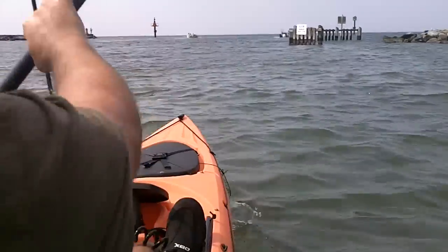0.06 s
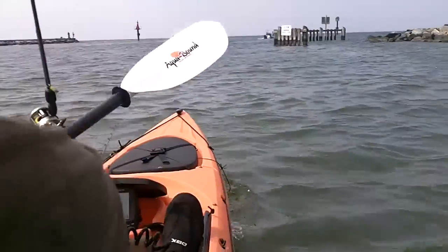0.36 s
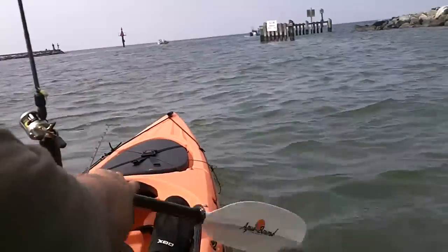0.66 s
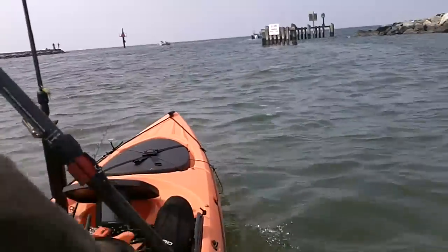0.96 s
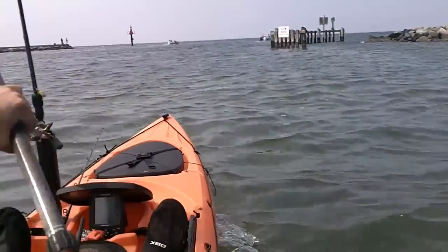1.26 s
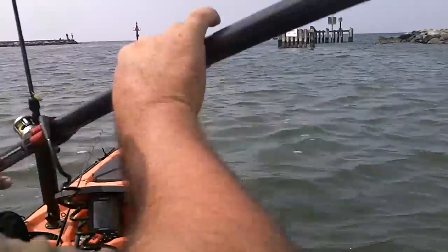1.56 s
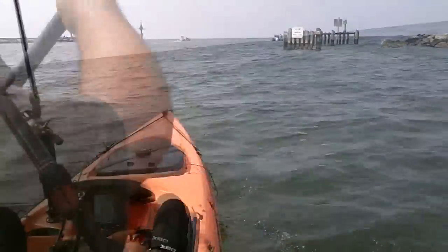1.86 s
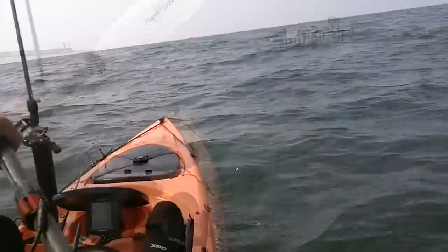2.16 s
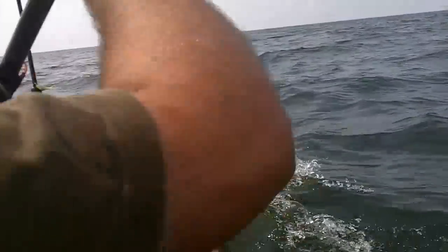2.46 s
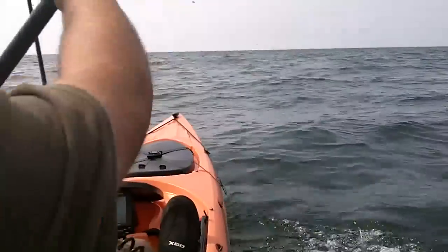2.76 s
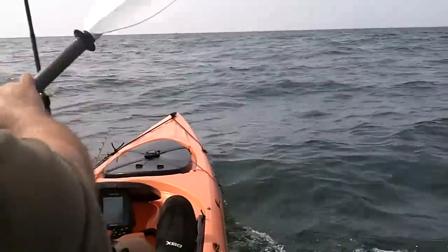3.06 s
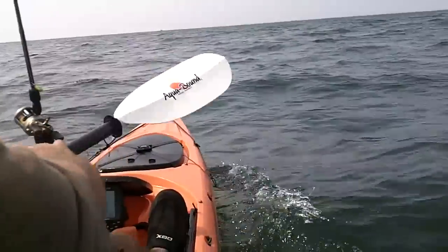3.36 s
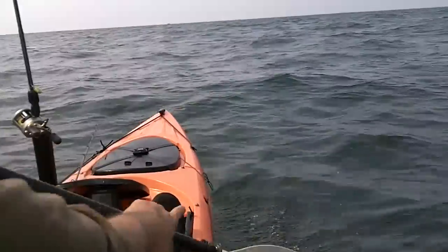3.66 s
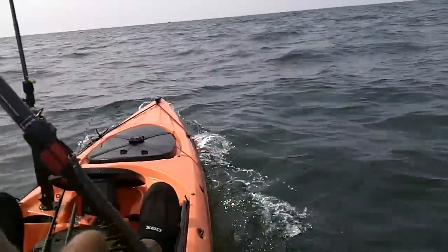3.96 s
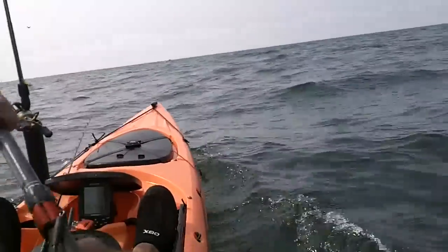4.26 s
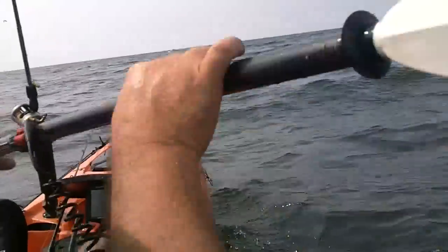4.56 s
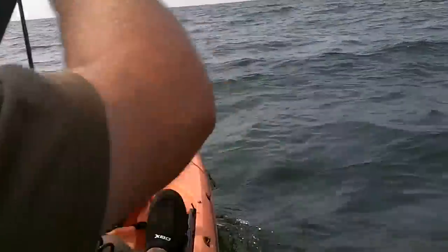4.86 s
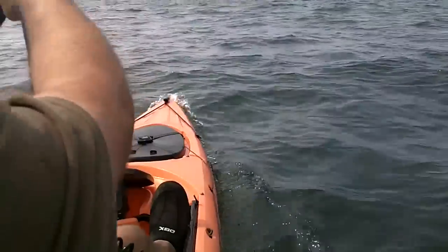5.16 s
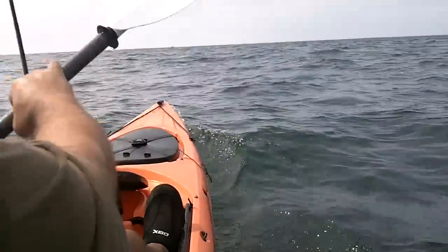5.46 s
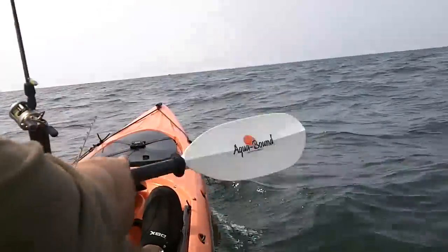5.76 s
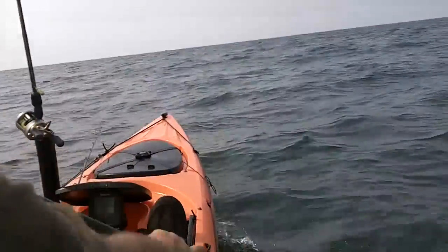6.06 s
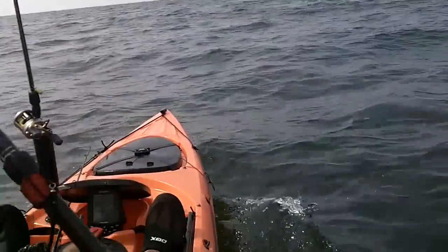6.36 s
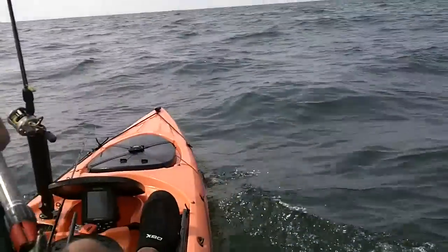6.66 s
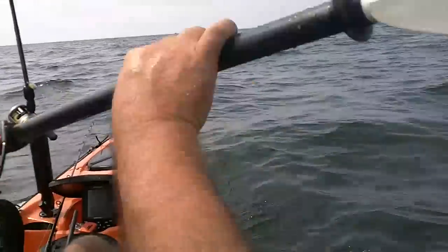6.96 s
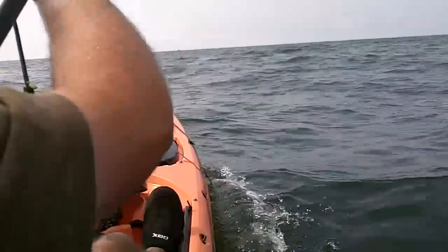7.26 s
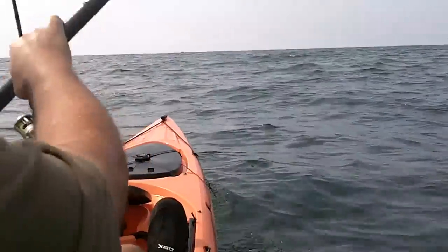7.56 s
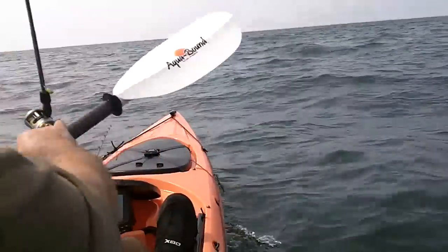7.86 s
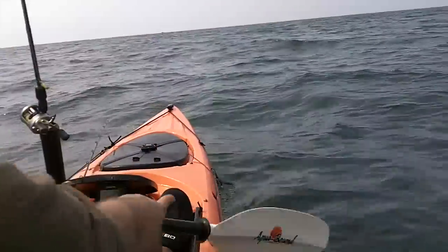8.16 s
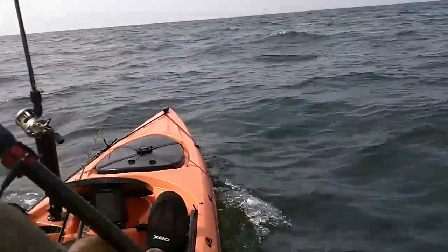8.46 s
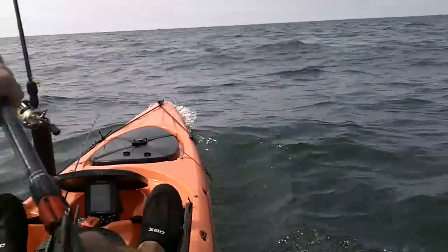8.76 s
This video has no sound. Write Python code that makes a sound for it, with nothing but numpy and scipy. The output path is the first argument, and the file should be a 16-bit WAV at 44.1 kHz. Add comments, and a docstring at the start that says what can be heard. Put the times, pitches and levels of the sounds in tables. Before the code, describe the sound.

Wind rumbles on a microphone just behind a kayak paddler on choppy open water, with no echo. Wavelets splash against the hull and single drops slap and plink close by throughout. Gusts thump during the first second, and the paddle shaft gives one dry knock at 0.7 seconds. The blade pulls through the water with gurgles and glugs at about 1.1 and 2.1 seconds, with more gusts around 1.7 and 2.5. A very faint high sizzle lies behind this opening. At 2.7 seconds there is a sharp click, the sizzle stops, and wind and water abruptly turn quieter. Further bubbling strokes come at about 4.2, 6.6 and 8.6 seconds, with a few small bright ticks along the way. Gusts return around 3.6, 4.8 and 5.7 to 6 seconds, and are strongest from 7.1 to 8.4, briefly pushing the water down beneath their low thumps.

```python
"""A kayak paddle pulling through choppy open water, heard from a camera just behind the paddler.
The blades drag air under, which gurgles and glugs; the shaft knocks once, wavelets slap the hull
and drops patter back on the sea, with no echo. Gusts rumble and thump on the exposed microphone,
and its gain control ducks the water under them; the housing cuts narrow notches in the treble."""
import sys
import numpy as np
from scipy import signal
from scipy.fft import rfft, irfft, next_fast_len
from scipy.io import wavfile
from scipy.ndimage import map_coordinates

SR = 44100
rng = np.random.default_rng(int(sys.argv[2]) if len(sys.argv) > 2 else 0)


def waveform_to_disk(signal):
    """Save audio, clipped to [-1, 1], as 16-bit WAV at the path in sys.argv[1]."""
    frames = np.transpose(np.atleast_2d(signal))
    scaled = np.clip(frames, -1, 1) * 32767
    samples = np.round(scaled).astype(np.int16)
    wavfile.write(sys.argv[1], SR, samples)


N = 397998

# Levels are relative: each source applies its own gain on top.
# spectra at the microphone: f/Hz, level/dB
SIZZLE_SPECTRUM = [(5000, -33), (5800, 1), (6100, -4), (6370, -2.5), (6800, -6), (7300, -16), (8000, -47)]  # faint high band in the background
RUMBLE_SPECTRUM = [(8, -22), (20, -7.5), (35, 2.5), (70, -4.5), (100, -7), (140, -15.5), (200, -28.5),
                   (400, -46), (1000, -100)]  # slow swings of wind pressure
EDDY_SPECTRUM = [(40, -2.5), (90, -28), (150, 5), (250, -7.5), (400, -11.5), (800, -23.5), (1600, -35.5),
                 (4000, -100), (9000, -83)]  # small separate eddies
CHURN_SPECTRUM = [(40, -17), (90, -17.5), (150, 2), (250, -0.5), (400, -23), (800, -50), (1600, -60)]  # smooth turbulence beneath them
CRACKLE_SPECTRUM = [(1000, -6), (4900, 3), (6500, -22), (9600, -1), (14500, -9.5)]  # an eddy's tip in the microphone port
SPLASH_SPECTRUM = [(100, -0.5), (250, -0.5), (500, -4), (900, -5), (1500, -6), (2200, -9), (3200, -18.5),
                   (6000, -31), (12000, -72)]  # body of breaking water
SPRAY_SPECTRUM = [(1200, -3.5), (2400, -13), (3300, 1.5), (4900, 1.5), (5150, -9), (6200, -10), (7200, -19),
                  (8400, -24.5), (9600, -20), (12000, -21.5), (13600, -28), (15200, -28)]  # fine spray
TICK_SPECTRUM = [(1500, -34), (4500, 4), (7000, -10), (9500, -5), (12000, -8), (15000, -16)]  # ticks and bursting foam
GURGLE_SPECTRUM = [(150, -34), (300, -4.5), (500, -2), (800, -9.5), (1300, -18), (3000, -53)]  # bubbles behind a blade
# course of the background sizzle: t/s, level/dB
SIZZLE_LEVELS = [(0, -1), (2.6, 3), (2.72, -43)]
# breeze on the microphone between gusts: t/s, rumble/dB, eddies/dB
BREEZE_LEVELS = [(0, -18, -28.5), (.85, -17.5, -33), (1.4, -16.5, -25), (2.1, -15, -26), (2.68, -17.5, -29),
                 (2.76, -29, -39), (3.1, -28, -38.5), (3.75, -23.5, -45), (4.4, -24, -37),
                 (5.1, -25.5, -54.5), (6.3, -21, -45), (6.55, -26, -60), (6.9, -24.5, -42),
                 (7.45, -18.5, -42), (8.2, -21, -41), (8.55, -26.5, -42.5), (9.02, -23.5, -37)]
# gusts on the microphone: t/s, length/s, pressure/dB, eddies/dB relative to the pressure
WIND_GUSTS = [(.172, 0.024, 0.5, -16.5), (0.345, 0.046, -3, -12), (.435, 0.027, 1.5, -29),
              (0.595, 0.037, 2, -17), (0.757, 0.036, 1, -18), (1.018, 0.082, -10, -19),
              (1.685, .15, 3, -20.5), (1.9, 0.018, -11, -11.5), (2.22, 0.033, -8.5, -10.5),
              (2.47, .03, -1.5, -8), (2.554, 0.04, -3.5, -16), (2.7, 0.012, -7, -12.5),
              (2.805, 0.086, -10, -18), (3.564, 0.072, -4, -32), (3.93, 0.022, 1.5, -26.5),
              (4.731, 0.08, -3, -16.5), (4.84, 0.075, 2.5, -21), (5.687, 0.089, 0, -17.5),
              (5.864, 0.035, -3.5, -18.5), (5.963, 0.036, -2.5, -24), (6.018, 0.041, 5.5, -27),
              (7.11, 0.21, -2, -14), (7.286, 0.093, 3, -18), (7.685, 0.052, 5.5, -15.5),
              (7.78, 0.078, 9, -23.5), (7.999, 0.078, 2, -19.5), (8.242, 0.019, 0.5, -25),
              (8.299, .085, 4, -20.5)]
# the hardest eddies to hit the microphone port: t/s, level/dB, half width/ms
PORT_BUFFETS = [(0.18, 0.5, 0.99), (0.358, 2, 0.99), (.402, -7, .73), (.441, 5.5, 2.8), (.593, 2.5, 4.1),
                (.626, -5, 0.24), (1.326, -7, 0.35), (1.68, 2, 0.55), (1.706, -1.5, 0.64), (1.755, 1, 1.9),
                (2.225, 0.5, 0.69), (2.475, 1, 0.49), (2.603, 0.5, 1.9), (2.712, 5.5, 1.6),
                (2.84, -3.5, 2.8), (2.887, -4, 1.7), (3.373, -6.5, 2), (3.556, 7.5, 0.51), (3.603, 3.5, 14),
                (3.94, -7.5, 1.6), (4.745, -0.5, 1.4), (4.792, -9, .79), (4.857, 5, 0.37),
                (4.872, 0.5, .68), (4.94, -4, 1.3), (5.691, -8, 1.2), (5.741, -5, 1.1), (5.793, -5, 0.86),
                (5.875, -1, 3.8), (5.932, -1, 4.3), (5.97, -2.5, 0.65), (6.009, -2, 4.6),
                (7.102, -0.5, 0.93), (7.167, 2.5, 1.1), (7.195, -8, 1), (7.221, -6.5, .9),
                (7.299, -3, 0.18), (7.326, -7, 0.39), (7.389, -0.5, 3.6), (7.677, -6.5, 1.8),
                (7.715, 8, 4.8), (7.823, -2.5, 0.42), (7.975, -6, 0.75), (8.004, 4, 3.5),
                (8.043, -3.5, 0.48), (8.334, 3, 0.77), (8.376, -0.5, 0.55)]
# choppy sea all around the boat: t/s, splash/dB, spray/dB
SEA_LEVELS = [(0, -38.5, -42), (.25, -42, -45), (.9, -42, -46.5), (1.2, -43.5, -43), (1.45, -38.5, -38.5),
              (1.9, -39, -41), (2.69, -35.5, -37.5), (2.74, -48.5, -50.5), (3.3, -41, -44.5),
              (3.75, -49, -48.5), (4.1, -43, -42.5), (4.7, -38.5, -42), (5.15, -47.5, -50),
              (5.6, -48, -50.5), (6.95, -40.5, -41.5), (7.55, -44.5, -47.5), (8.5, -43.5, -47.5),
              (8.75, -38, -42.5)]
# wavelets breaking and water thrown by a blade: t/s, splash/dB, spray/dB
NEAR_SPLASHES = [(.035, -37, -43), (.13, -44, -50), (.33, -59, -52), (0.529, -42, -41.5), (1.001, -38, -45),
                 (1.272, -40, -34.5), (1.411, -37, -38), (1.62, -35, -36), (1.98, -37, -44),
                 (2.418, -34, -34), (3.2, -48, -43.5), (3.27, -58, -49), (4.6, -43, -40), (4.981, -57, -49),
                 (6.115, -61, -47), (6.69, -54, -55), (6.958, -37.5, -45.5), (8.14, -49, -44.5),
                 (8.75, -56, -50), (8.92, -53.5, -53)]
# short bright ticks and one sharp dry click: t/s, level/dB
BRIGHT_TICKS = [(2.605, -39), (2.634, -44), (2.715, -20), (3.208, -34.5), (3.252, -40), (3.37, -33),
                (3.788, -31.5), (5.537, -34), (7.47, -29)]
# slaps and drops beside the boat: t/s, level/dB, f/Hz, slap/dB relative to the level
WATER_DROPS = [(0.8583, -18, 4040, -8), (1.1883, -18.5, 3140, 0.5), (1.557, -13.5, 4280, -25),
               (2.0363, -17.5, 1520, -19), (2.111, -17, 3860, -2.5), (2.6035, -14.5, 1090, 4),
               (3.1526, -21.5, 3500, -28), (3.474, -17, 4470, -18), (3.7743, -27, 3060, -6),
               (3.9144, -18.5, 1170, -5), (4.1159, -21.5, 2120, 0.5), (4.4172, -20.5, 4760, -26),
               (5.48, -24, 3280, -19), (6.113, -16.5, 4770, -36), (6.127, -21.5, 3880, -28),
               (6.612, -18, 1390, -3), (6.685, -17.5, 990, -14), (6.9964, -17, 4700, -4),
               (7.91, -29, 810, 12.5), (8.7364, -14.5, 4930, -8), (8.8467, -35, 1310, 11),
               (8.9255, -16, 960, -1), (8.9335, -24, 3560, -10)]
# a hard knock of the paddle: t/s, level/dB
PADDLE_KNOCKS = [(0.7025, -19.5)]
# modes of the paddle shaft: f/Hz, level/dB, t60/s
SHAFT_MODES = [(740, -0.5, 0.029), (1310, 9, 0.0057), (2040, 14.5, 0.0047), (3540, -3.5, 0.024),
               (9800, -16, .005)]
# the largest air pockets closing behind a blade or under the hull: t/s, level/dB, f/Hz
AIR_POCKETS = [(1.145, -22, 520), (1.182, -28, 682), (1.299, -23.5, 547), (1.361, -18.5, 462),
               (1.41, -21, 254), (1.63, -28, 868), (2.082, -28, 1440), (2.09, -20, 538), (2.097, -23, 784),
               (2.162, -23, 490), (2.223, -19, 916), (2.244, -21, 734), (2.28, -25, 486), (4.212, -18, 604),
               (4.223, -20, 1150), (4.36, -25.5, 1340), (4.366, -23, 501), (4.393, -21, 346),
               (4.462, -21.5, 312), (4.485, -28, 473), (4.562, -24, 990), (4.68, -26, 1100),
               (5.055, -33, 674), (5.225, -33.5, 552), (6.565, -26.5, 793), (6.703, -19, 1120),
               (6.86, -21, 1590), (6.9, -20, 1420), (6.931, -24, 1180), (6.964, -35, 440),
               (7.028, -34, 488), (7.867, -19, 1710), (8.13, -27, 1450), (8.662, -22, 807),
               (8.769, -23, 485), (8.925, -26, 336)]
# pulls of a blade, ahead of the microphone: t/s, length/s, level/dB
PADDLE_STROKES = [(1.13, .5, -34.5), (2.07, 0.28, -37), (4.193, 0.76, -36), (6.57, 0.58, -48),
                  (8.642, 0.4, -39.5)]
# cancellations in the camera housing: f/Hz, width/Hz
HOUSING_NOTCHES = [(2730, 520), (5500, 520), (7880, 900), (10950, 650)]


def amp(db):
    """Decibels to gain."""
    return 10 ** (np.asarray(db) / 20)


def unit(x):
    """Scale to rms 1."""
    return x / np.sqrt(np.mean(x ** 2) + 1e-20)


def curves(rows):
    """One value per sample for each column after the time."""
    times, *columns = np.transpose(rows)
    return [np.interp(np.arange(N) / SR, times, column) for column in columns]


def wobble(rate):
    """A smooth random curve, rate knots a second."""
    return map_coordinates(rng.standard_normal(4096), [np.arange(N) * rate / SR + 2], mode="wrap")


def filtered(x, response):
    """x through a complex frequency response."""
    size = next_fast_len(N + SR // 2)
    return irfft(rfft(x, size) * response(np.fft.rfftfreq(size, 1 / SR)), size)[:N]


def coloured(x, spectrum):
    """x shaped by (f/Hz, level/dB) points, at rms 1."""
    f, db = np.transpose(spectrum)
    return unit(filtered(x, lambda hz: amp(np.interp(np.log(hz + 1), np.log(f), db))))


def noise(spectrum):
    """Steady noise with this spectrum, at rms 1."""
    return coloured(rng.standard_normal(N), spectrum)


def add(track, start, sound):
    """Mix a sound into the track, start seconds in."""
    i = int(np.clip(round(start * SR), 0, N - 1))
    track[i:i + len(sound)] += sound[:N - i]


def decay(t, t60):
    """Exponential fade by 60 dB in t60."""
    return np.exp(-np.log(1000) * t / t60)


def onset(t, attack_s):
    """Exponential rise from 0 towards 1."""
    return 1 - np.exp(-t / attack_s)


def swell(start, length, attack_s, release_s):
    """An envelope that rises just before start, holds for length and dies away."""
    t = np.arange(N) / SR - start
    rise = np.clip(t / attack_s + 1, 0, 1)
    return rise ** 2 * np.exp(-np.clip((t - length) / release_s, 0, 20))


def impulses(count, range_db):
    """Pushes and pulls at random moments, of random size."""
    when, size, side = rng.random((count, 3)).T
    return np.bincount((when * N).astype(int), np.sign(side - .5) * amp(range_db * size), N)


def bubble(t, hz, t60, glide, attack_s):
    """A ringing air pocket whose pitch glides, by a fraction of hz, as it moves under the surface."""
    pitch = hz * (1 + glide * np.minimum(t / t60, 1))
    phase = 2 * np.pi * np.cumsum(pitch, axis=-1) / SR
    return np.sin(phase) * decay(t, t60) * onset(t, attack_s)


def bubbles(count, lo_hz, hi_hz, cycles, spread_db, glide, attack_cycles=1.3):
    """A swarm of bubbles of random size, each ringing for roughly cycles periods, at rms 1."""
    when, smallness, force, life = rng.random((count, 4)).T[:, :, None]
    hz = lo_hz * (hi_hz / lo_hz) ** smallness
    t60 = cycles * (.5 + life) / hz
    t = np.arange(min(int(SR * cycles / lo_hz), 3000000 // count)) / SR
    gain = amp(-spread_db * np.log(1 - .98 * force)) * hz / lo_hz  # about equal power per Hz
    rings = gain * bubble(t, hz, t60, glide, attack_cycles / hz)
    index = (when * N).astype(int) + np.arange(len(t))
    return unit(np.bincount(index.ravel(), rings.ravel(), N)[:N])


def froth(swarm, spectrum, hiss_db):
    """Single bubbles on the even hiss of countless smaller ones."""
    return coloured(swarm + amp(hiss_db) * rng.standard_normal(N), spectrum)


def sizzle(level_db=-60, waver_db=-1.5):
    """A thin, wavering sizzle far in the background, gone within three seconds."""
    return noise(SIZZLE_SPECTRUM) * amp(curves(SIZZLE_LEVELS)[0] + level_db + waver_db * wobble(12.8))


def gusts():
    """Pressure of the gusts on the microphone, and the strength of the eddies that they shed."""
    pressure, eddies = np.zeros((2, N))
    for start, length, db, eddy_db in WIND_GUSTS:
        push = amp(db) * swell(start, length, attack_s=.019, release_s=.0076)
        pressure += push
        eddies += amp(eddy_db) * push
    return pressure, eddies


def buffets(level_db=.5, wake=.2, scatter_s=.00451, round_hz=1900, leak_hz=35,
            crackle_db=-51, crackle_s=.0024):
    """An eddy right on the port is a cusp of suction amid smaller whirls; its tip crackles."""
    cusps, tips = np.zeros((2, N))
    t = np.arange(-(SR // 20), SR // 20) / SR
    for centre, db, half_width_ms in PORT_BUFFETS:
        half_width = half_width_ms / 1000
        shift, size = rng.standard_normal((2, 4, 1))
        whirls = wake * size * np.exp(-abs(t - scatter_s * shift) / half_width)
        suction = np.exp(-abs(t) / half_width)
        add(cusps, centre + t[0], amp(db + level_db) * (whirls.sum(0) - suction))
        add(tips, centre + t[0], amp(db + crackle_db) * np.exp(-abs(t) / crackle_s))
    # the port rounds the tip, and steady pressure leaks away
    thumps = filtered(cusps, lambda hz: 1j * hz / (leak_hz + 1j * hz) / (1 + (hz / round_hz) ** 2))
    return thumps + tips * noise(CRACKLE_SPECTRUM)


def wind(rumble_db=-1, gust_rumble_db=-9, eddy_db=-2, churn_db=-4, buffet_gain=1.44):
    """Slow pressure swings and small eddies tumble over the microphone; gusts drive them harder."""
    breeze_rumble_db, breeze_eddy_db = curves(BREEZE_LEVELS)
    pressure, gust_eddies = gusts()
    rumble = unit(noise(RUMBLE_SPECTRUM) * amp(1.47 * wobble(13)))
    cusps = coloured(impulses(count=1100, range_db=10), EDDY_SPECTRUM)
    churn = coloured(rng.standard_normal(N) * amp(2 * wobble(83)), CHURN_SPECTRUM)
    eddies = unit(cusps + amp(churn_db) * churn)
    rumble_gain = np.hypot(amp(breeze_rumble_db + rumble_db), amp(gust_rumble_db) * pressure)
    breeze_flutter = amp(breeze_eddy_db - 1.1 * wobble(16))
    gust_flutter = gust_eddies * amp(2 * wobble(70))
    eddy_gain = amp(eddy_db) * np.hypot(breeze_flutter, gust_flutter)
    thumps = np.hypot(1, buffet_gain * pressure) * buffets()
    return pressure + rumble_gain * rumble + eddy_gain * eddies + thumps


def chop(splash_db=2, spray_db=-.5, droplet_db=-8, fizz_db=-28):
    """Wavelets and thrown water around the boat: spurts of bubbles and spray, droplets, bursting foam."""
    gains = amp(curves(SEA_LEVELS)) * amp(.95 * wobble(14))
    for start, *db in NEAR_SPLASHES:
        envelope = swell(start, length=.03, attack_s=.022, release_s=.012)
        gains = np.hypot(gains, amp(db)[:, None] * envelope)
    splash_gain, spray_gain = gains
    spurts_db = 1.6 * wobble(55)  # shared by splash and spray
    large = bubbles(count=3000, lo_hz=491.5, hi_hz=3445, cycles=22, spread_db=2.5, glide=.34)
    small = bubbles(count=9000, lo_hz=2173, hi_hz=15700, cycles=24, spread_db=1.5, glide=.073)
    splash = unit(froth(large, SPLASH_SPECTRUM, hiss_db=9) * amp(spurts_db + 1.5 * wobble(30)))
    spray = unit(froth(small, SPRAY_SPECTRUM, hiss_db=2.5) * amp(spurts_db + 1.5 * wobble(120)))
    droplets = bubbles(count=260, lo_hz=1297, hi_hz=5090, cycles=45, spread_db=2, glide=.049)
    foam = bubbles(count=300, lo_hz=6000, hi_hz=14200, cycles=12, spread_db=4.5, glide=.02)
    fizz = coloured(foam, TICK_SPECTRUM)
    fine_water = amp(spray_db) * spray + amp(droplet_db) * droplets + amp(fizz_db) * fizz
    return splash_gain * amp(splash_db) * splash + spray_gain * fine_water


def ticks(level_db=-6, t60=.011):
    """Short bright ticks, and one sharp dry click where the sound abruptly drops."""
    envelope, t = np.zeros(N), np.arange(SR // 20) / SR
    for start, db in BRIGHT_TICKS:
        add(envelope, start, amp(db + level_db) * decay(t, t60))
    return envelope * noise(TICK_SPECTRUM)


def drops(ring_db=-1, slap_db=-5, spatter_db=-12, ring_t60=.019, slap_t60=.037, attack_s=.00087):
    """Water lands close by with a slap and a spatter, and traps one small bubble."""
    rings, slaps, spatter = np.zeros((3, N))
    t = np.arange(SR // 10) / SR
    burst = decay(t, slap_t60) * onset(t, attack_s)
    for start, db, hz, body_db in WATER_DROPS:
        add(rings, start, amp(db + ring_db) * bubble(t, hz, ring_t60, glide=.018, attack_s=attack_s))
        add(slaps, start, amp(db + body_db + slap_db) * burst)
        add(spatter, start, amp(db + spatter_db) * burst)
    return rings + slaps * noise(SPLASH_SPECTRUM) + spatter * noise(SPRAY_SPECTRUM)


def shaft_knock(ring_db=1, crack_db=-7, crack_t60=.0089, attack_s=.000065):
    """The paddle shaft, damped by the hands, gives a dry click at close range."""
    track, t = np.zeros(N), np.arange(SR // 10) / SR
    ring = sum(amp(db) * np.sin(2 * np.pi * hz * t) * decay(t, t60) for hz, db, t60 in SHAFT_MODES)
    for start, db in PADDLE_KNOCKS:
        crack = amp(crack_db) * rng.standard_normal(len(t)) * decay(t, crack_t60)
        add(track, start, amp(db) * (amp(ring_db) * ring + crack) * onset(t, attack_s))
    return track


def glugs(level_db=1, attack_s=.0012, slosh_db=-11, slosh_t60=.04,
          shed_db=-15, shed_within_s=.028, shed_octaves=.585):
    """Big air pockets close with a slosh, shed smaller ones and sink in pitch as they are pulled under."""
    rings, slosh = np.zeros((2, N))
    t = np.arange(SR // 4) / SR

    def pocket(hz):
        t60 = .12 * (500 / hz) ** 1.35  # higher pockets die sooner
        return bubble(t, hz, t60, glide=-.15, attack_s=attack_s)

    for start, db, hz in AIR_POCKETS:
        add(rings, start, amp(db + level_db) * pocket(hz))
        add(slosh, start, amp(db + slosh_db) * decay(t, slosh_t60) * onset(t, attack_s))
        for lateness, smallness in rng.random((2, 2)):
            shed_hz = hz * 2 ** (shed_octaves * smallness)
            add(rings, start + shed_within_s * lateness, amp(db + shed_db) * pocket(shed_hz))
    roughness = 1 + .25 * wobble(220)
    return rings * roughness + slosh * noise(SPLASH_SPECTRUM)


def paddle(level_db=-1, sag_db_per_s=12, flicker_db=3):
    """A blade just ahead drags air down, which breaks into large bubbles, most early in the pull."""
    effort, t = np.zeros(N), np.arange(N) / SR
    for start, length, db in PADDLE_STROKES:
        pull = swell(start, length, attack_s=.072, release_s=.033)
        sag_db = sag_db_per_s * np.maximum(t - start, 0)
        effort += pull * amp(db + level_db - sag_db)
    swarm = bubbles(count=1000, lo_hz=300, hi_hz=1400, cycles=26, spread_db=2, glide=.08)
    gurgle = froth(swarm, GURGLE_SPECTRUM, hiss_db=-8)
    return effort * unit(gurgle * amp(flicker_db * wobble(25)))


def scene():
    """All that reaches one microphone behind the paddler; open water gives no echo."""
    water = chop() + paddle() + glugs() + drops()
    return (water + ticks() + wind() + shaft_knock() + sizzle())[None]


def housing(hz, depth=.96):
    """Narrow notches where two paths to the microphone cancel."""
    notches = [1 - depth * 1j * hz * width / (centre ** 2 - hz ** 2 + 1j * hz * width)
               for centre, width in HOUSING_NOTCHES]
    return np.prod(notches, axis=0)


def gain_control(x, threshold_db=-5, release_db_per_s=190, attack_s=.0021):
    """A gust or a loud thump pulls the gain down at once, and the water with it; then it recovers."""
    level_db = 20 * np.log10(abs(x) + 1e-6)
    ramp_db = release_db_per_s * np.arange(N) / SR
    held_db = np.maximum.accumulate(level_db + ramp_db) - ramp_db  # each peak falls at the release rate
    pole = np.exp(-1 / (attack_s * SR))
    cut_db = signal.lfilter([1 - pole], [1, -pole], np.maximum(held_db - threshold_db, 0))
    return x * amp(-cut_db)


def record(dry, low_cut_hz=14.6, top_hz=15400):
    """The camera's microphone chain: housing colour, gain control, low cut, overload and band limit."""
    x = gain_control(filtered(dry[0], housing))
    x = filtered(x, lambda hz: 1 - 1 / (1 + (hz / low_cut_hz) ** 4))  # blocks a gust's steady pressure
    x = x / (1 + x ** 6) ** (1 / 6)  # soft overload
    return filtered(x, lambda hz: hz < top_hz)[None]


dry = scene()
out = record(dry)
waveform_to_disk(out)
```